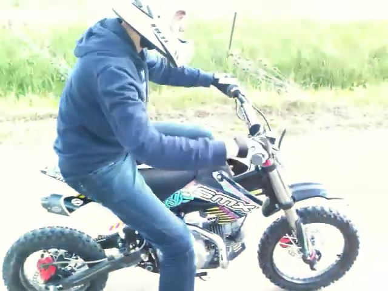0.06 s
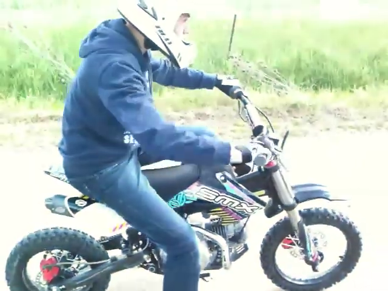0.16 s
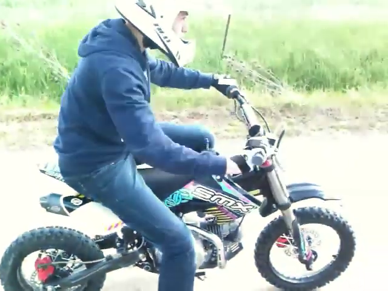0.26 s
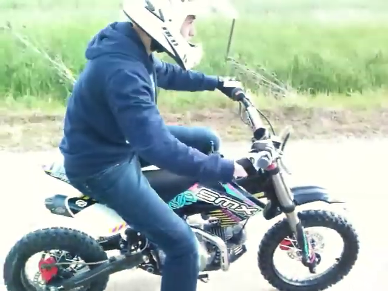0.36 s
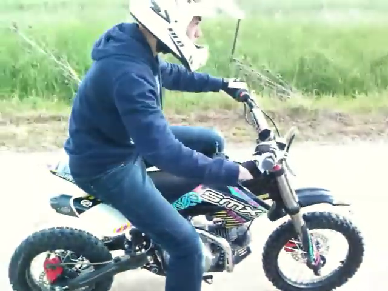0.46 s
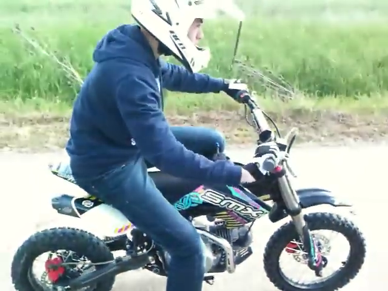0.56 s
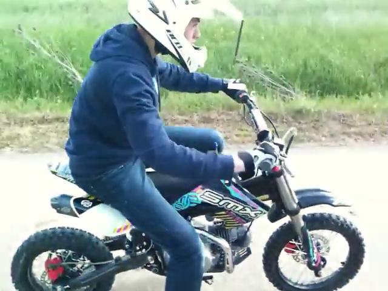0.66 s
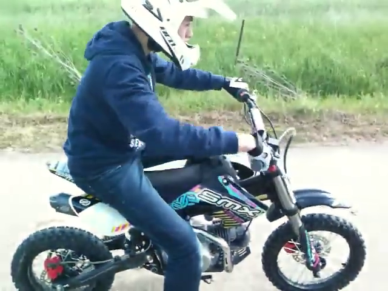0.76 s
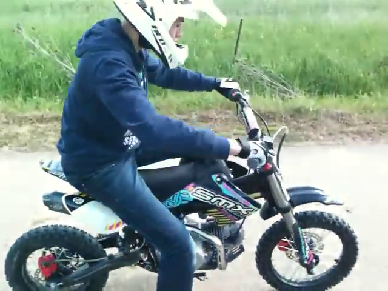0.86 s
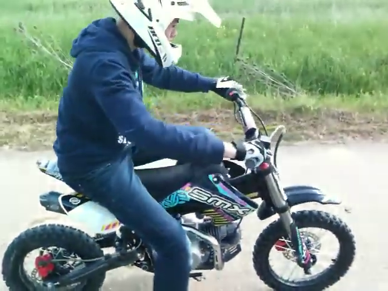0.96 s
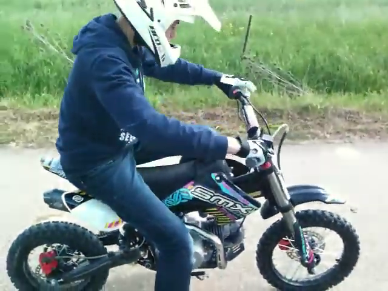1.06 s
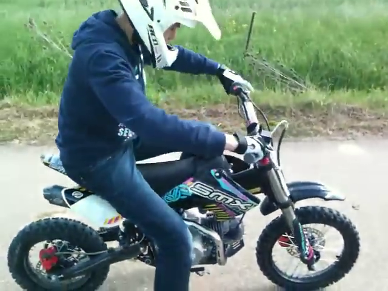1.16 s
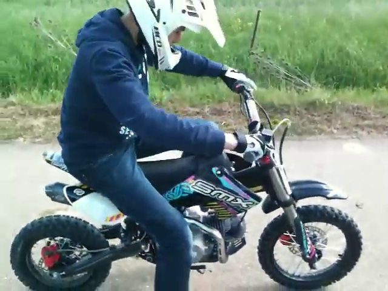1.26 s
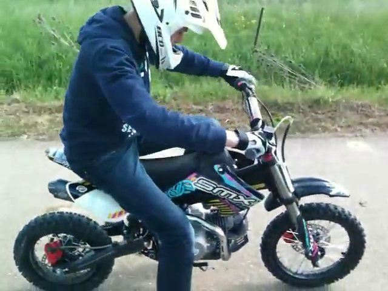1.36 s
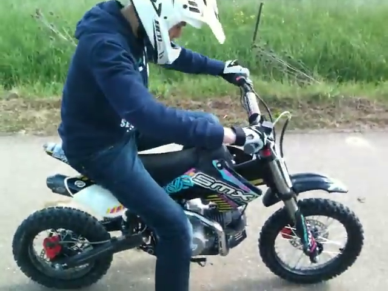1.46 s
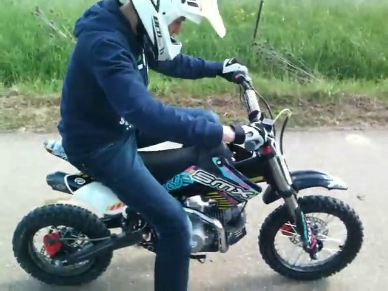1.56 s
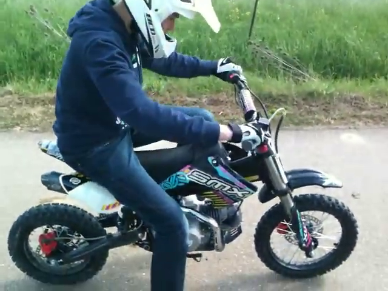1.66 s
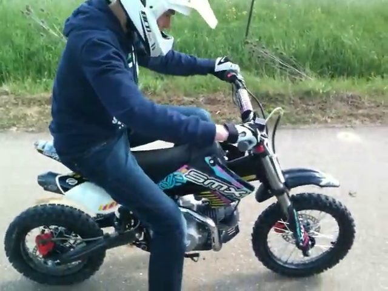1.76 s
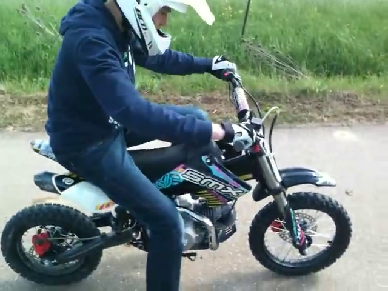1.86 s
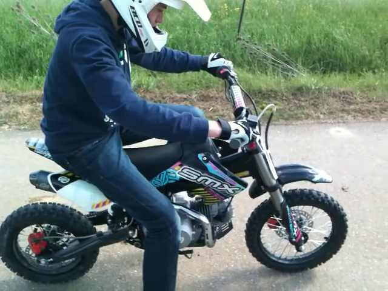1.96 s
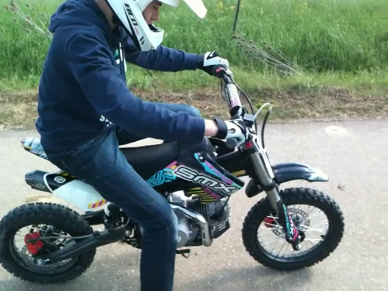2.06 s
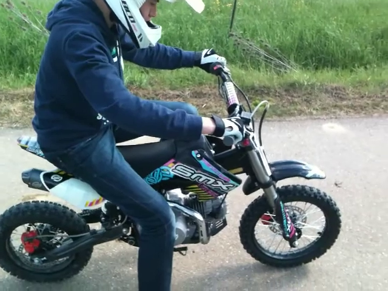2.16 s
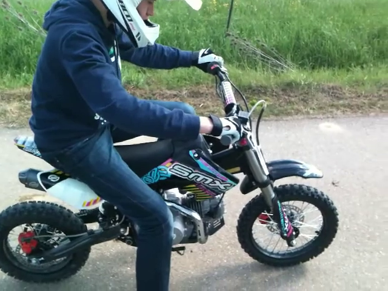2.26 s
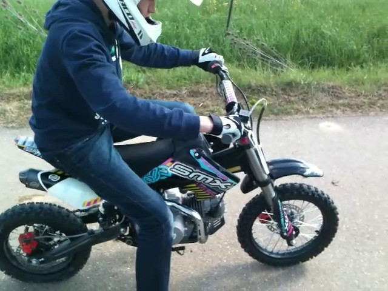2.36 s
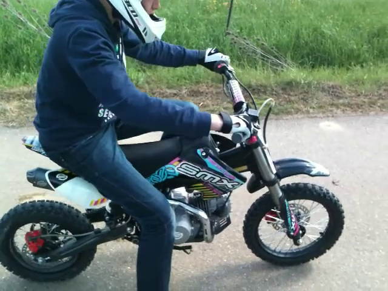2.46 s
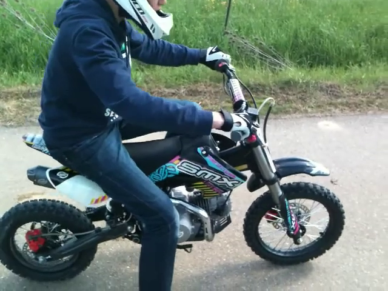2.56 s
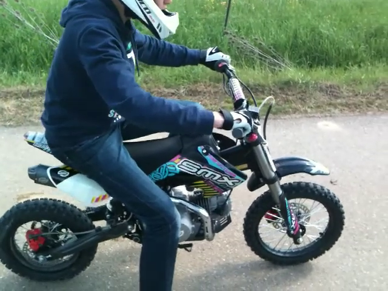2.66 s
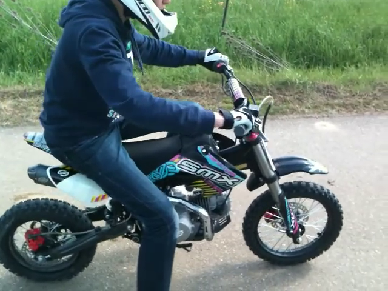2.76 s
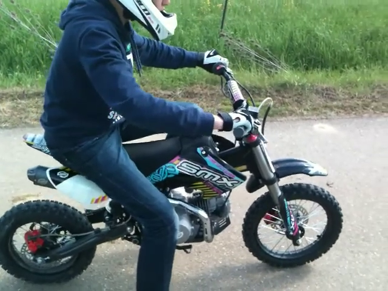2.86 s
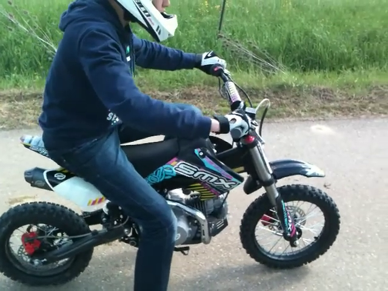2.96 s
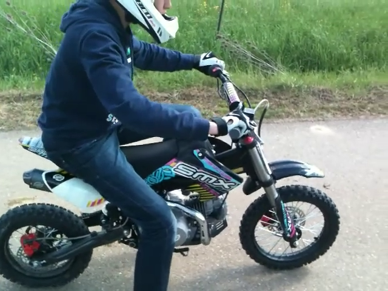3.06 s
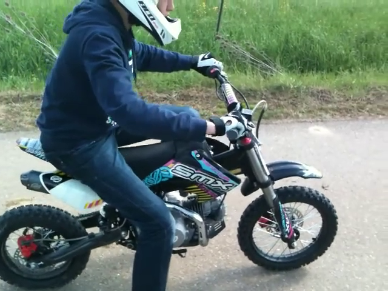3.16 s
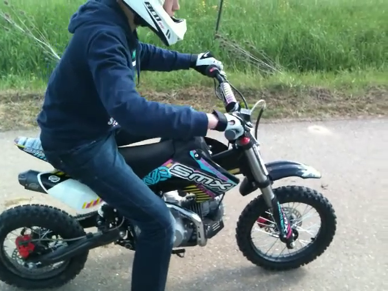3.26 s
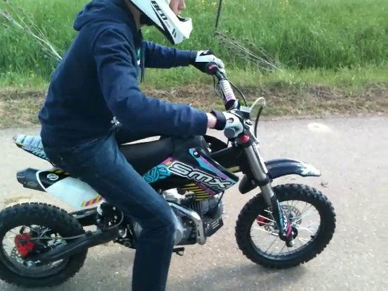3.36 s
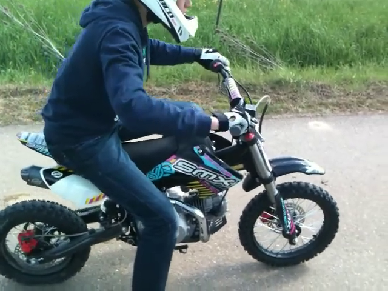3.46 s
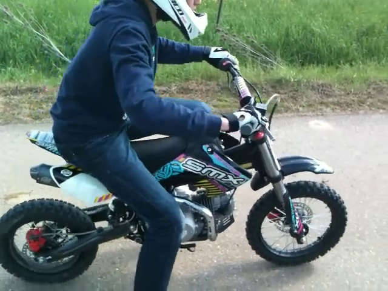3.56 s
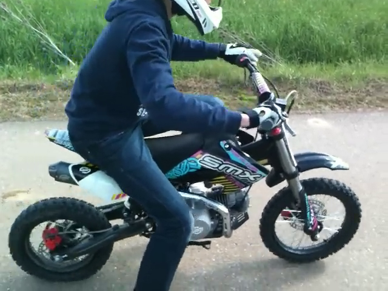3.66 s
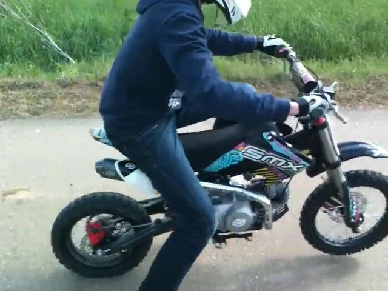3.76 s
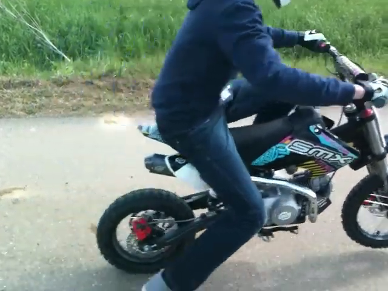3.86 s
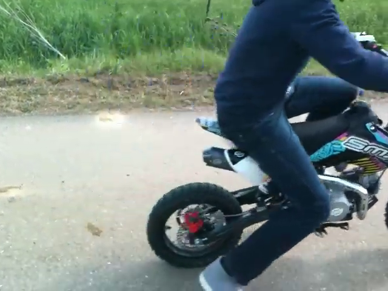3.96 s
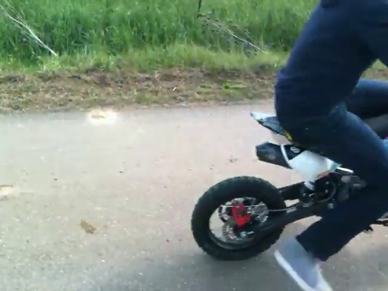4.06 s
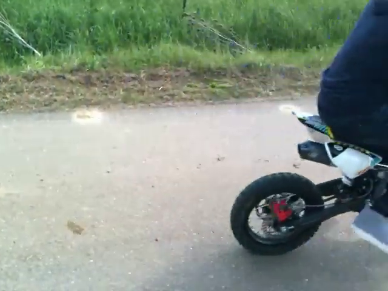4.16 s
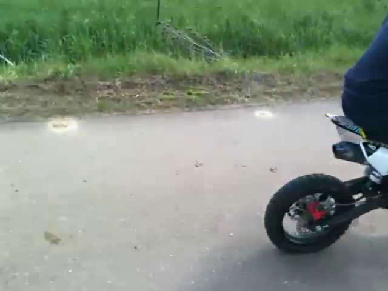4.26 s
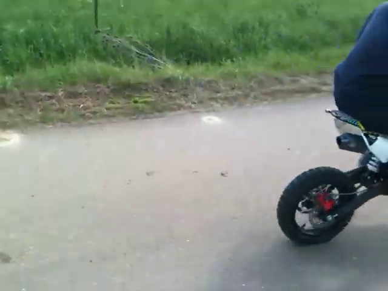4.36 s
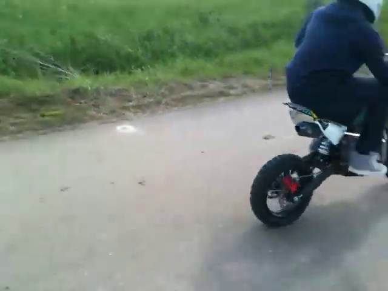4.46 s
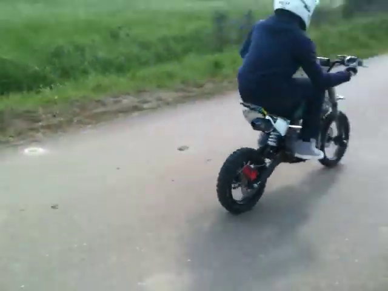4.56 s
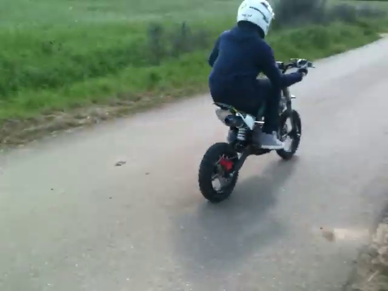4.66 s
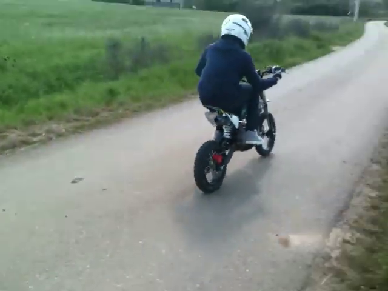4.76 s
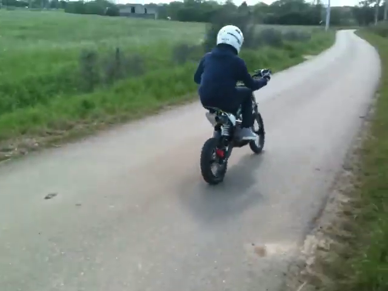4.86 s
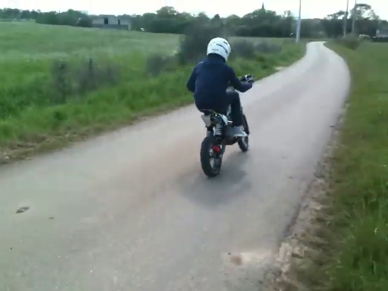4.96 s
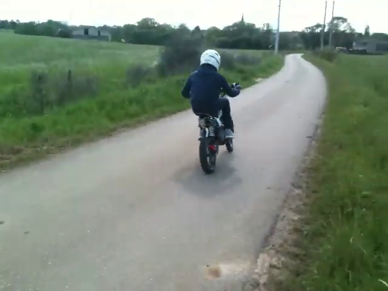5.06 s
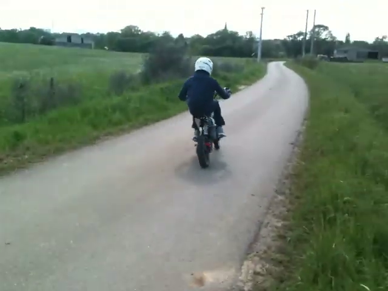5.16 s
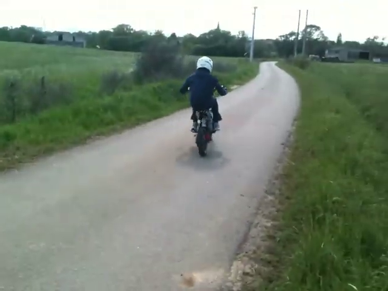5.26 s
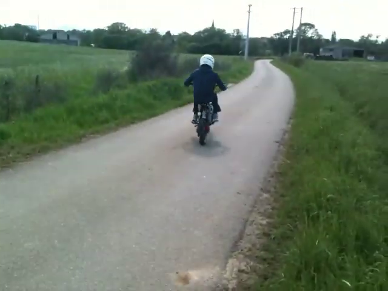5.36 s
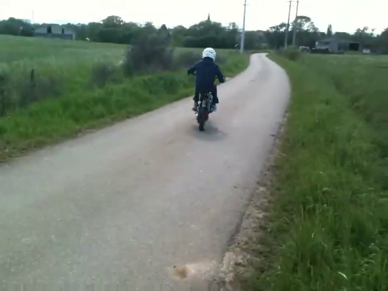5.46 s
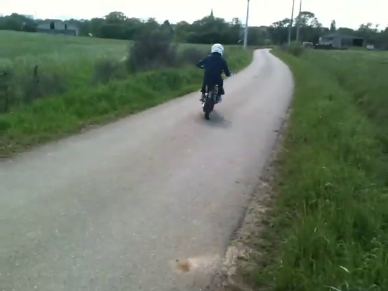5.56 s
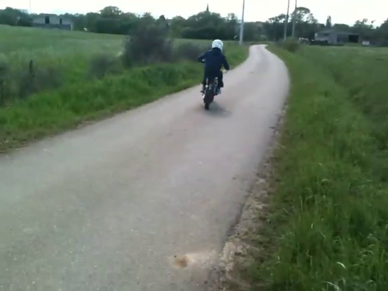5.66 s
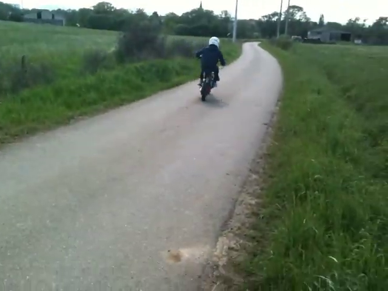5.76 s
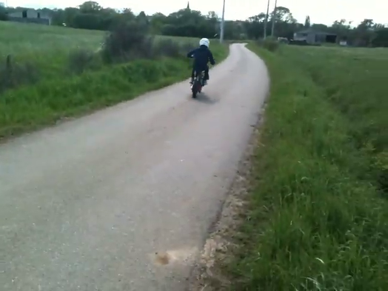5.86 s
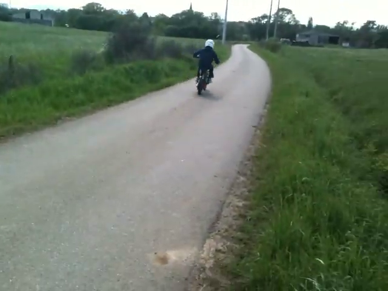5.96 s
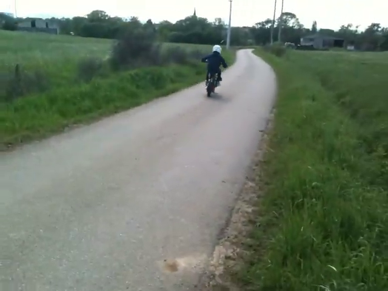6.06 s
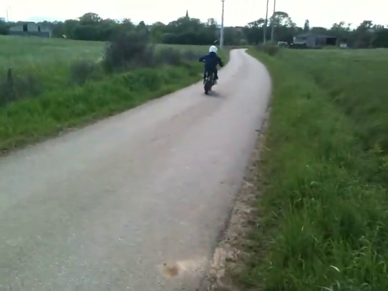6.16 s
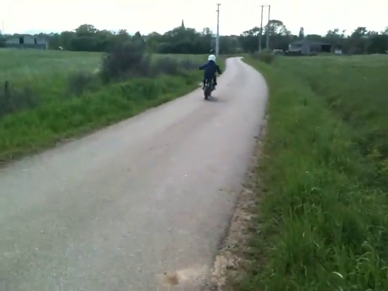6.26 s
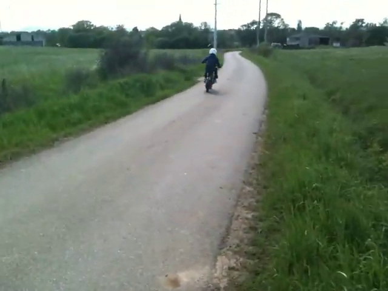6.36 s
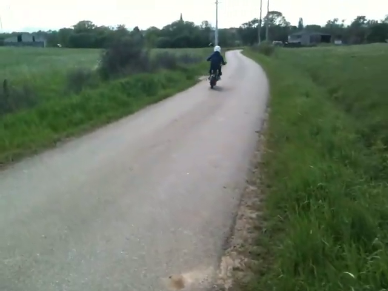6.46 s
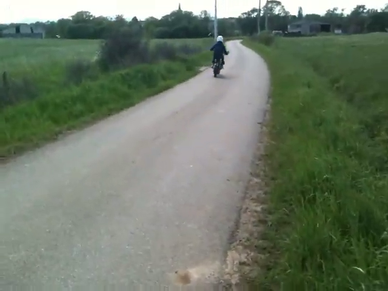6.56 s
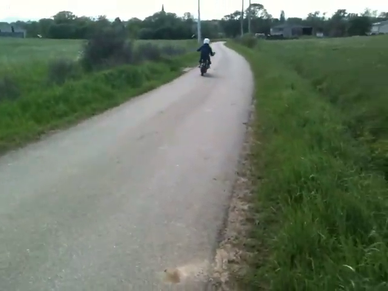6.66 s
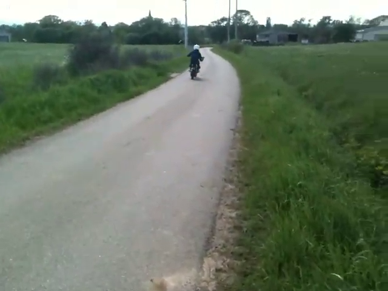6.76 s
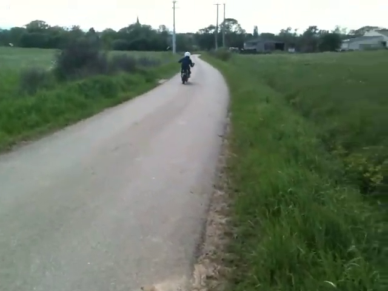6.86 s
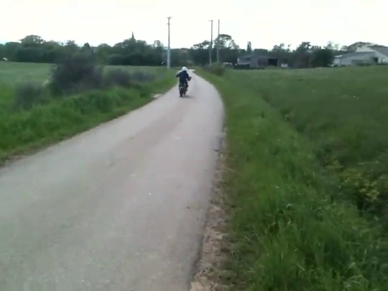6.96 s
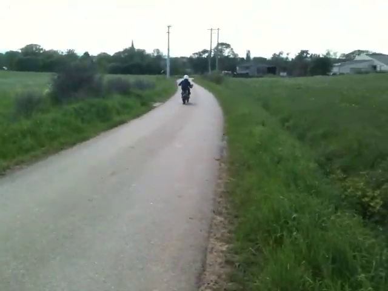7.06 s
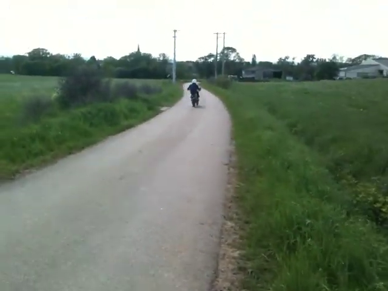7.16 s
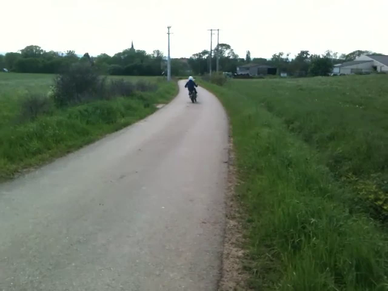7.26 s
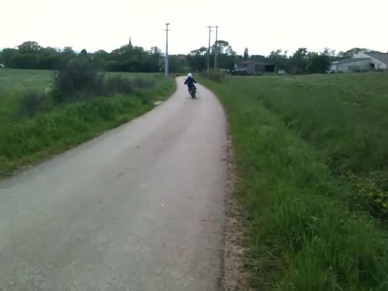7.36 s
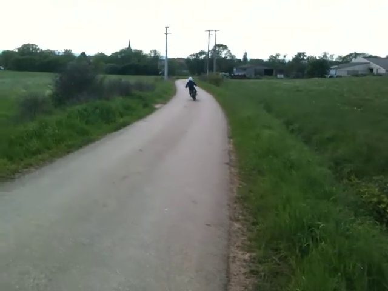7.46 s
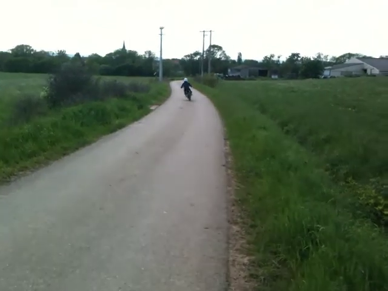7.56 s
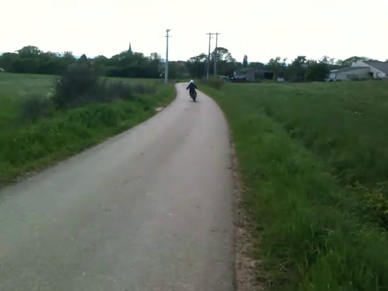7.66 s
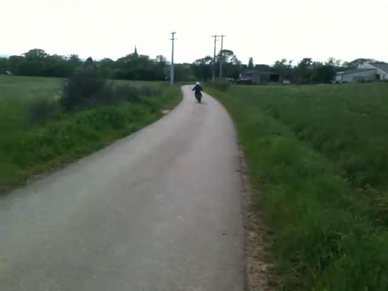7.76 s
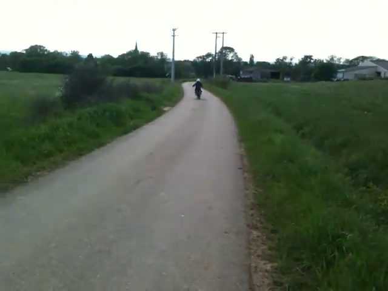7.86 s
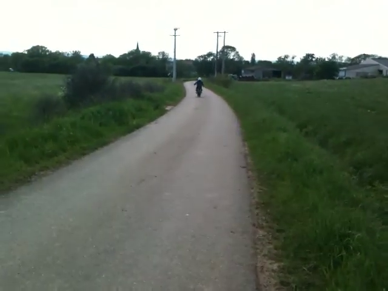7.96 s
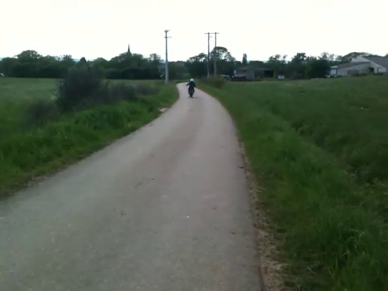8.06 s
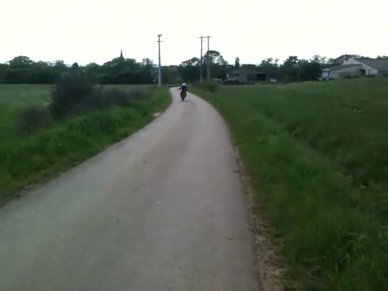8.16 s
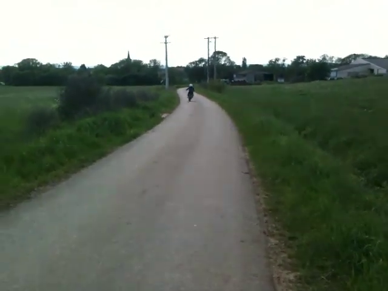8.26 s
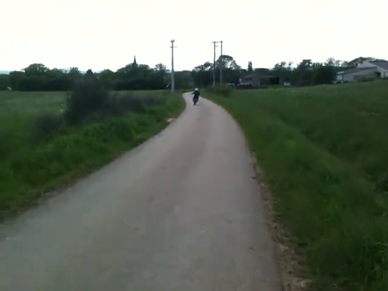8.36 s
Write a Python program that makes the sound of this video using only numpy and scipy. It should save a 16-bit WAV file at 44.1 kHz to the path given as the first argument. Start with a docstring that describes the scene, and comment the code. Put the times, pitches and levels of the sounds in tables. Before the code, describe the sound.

Close raspy pit bike blips, runs down to slow puttering and clatter, gets nudged, then accelerates off along an open lane, changing gear once.

```python
"""Pit bike blipped, then ridden off

A single-cylinder pit bike close by is blipped twice, runs down to idle and is nudged twice,
then pulls away along an open lane, shifts up and climbs in pitch again, far off.
Every firing is a pressure pulse that rings pipe and silencer, with hissing gas around it.
With the throttle shut only soft puffs and engine clatter remain; a faint tail and air noise lie beneath.
"""
import sys
import numpy as np
from scipy import signal
from scipy.fft import irfft
from scipy.io import wavfile
from scipy.ndimage import uniform_filter1d

SR = 44100
rng = np.random.default_rng(int(sys.argv[2]) if len(sys.argv) > 2 else 0)


def transcribe(u):
    """Save the signal u as a 16-bit wav file named by the first command-line argument.

    u: samples, shape (n,) or (channels, n), limited to [-1, 1]; the rate is SR.
    q: integer samples, one column per channel.
    """
    v = np.clip(np.atleast_2d(u).T, -1, 1)
    q = np.round(v * 32767).astype(np.int16)
    wavfile.write(sys.argv[1], SR, q)


N = 371763
PULSE_SAMPLES = 4096
HZ = np.fft.rfftfreq(PULSE_SAMPLES, 1 / SR)
TIME = np.arange(N) / SR
MID_RATE = 60  # firings per second at which levels are quoted


def amp(db):
    """Decibels to gain."""
    return 10 ** (np.asarray(db) / 20)


def at(table, s):
    """The columns of a curve table at the times s."""
    times, *columns = np.transpose(table)
    return [np.interp(s, times, column) for column in columns]


def read(points, hz):
    """A spectrum in dB on a log-frequency axis."""
    f, db = np.transpose(points)
    return np.interp(np.log(hz + 1), np.log(f), db)


def peak(hz, centre_hz, width_hz, height_db):
    """The dB that one resonance adds to a spectrum."""
    detune = 2 * (hz - centre_hz) / width_hz
    return 10 * np.log10(1 + (amp(height_db) ** 2 - 1) / (1 + detune ** 2))


# Resonances of the hollow before the microphone. Each row: centre in Hz, width in Hz, height in dB.
PORT = [(1886, 370, 4), (4900, 420, 25)]


def heard(points, hz):
    """A spectrum in dB with the microphone's resonances on it."""
    return read(points, hz) + sum(peak(hz, *mode) for mode in PORT)


def causal(db):
    """Minimum-phase spectrum: with these magnitudes it starts sharply and rings afterwards."""
    nepers = db * np.log(10) / 20
    mirrored = np.r_[nepers, nepers[-2:0:-1]]
    return np.exp(signal.hilbert(mirrored).conj()[:len(db)])


def noise(colour, gate=1):
    """Gated noise of rms 1 that rings in a colour."""
    x = signal.oaconvolve(gate * rng.standard_normal(N), irfft(causal(heard(colour, HZ))))[:N]
    return x / x.std()


def add(mix, s, spectrum):
    """Mixes in a pulse, given by its spectrum, at its exact time."""
    start, fraction = divmod(max(s, 0) * SR, 1)
    part = mix[int(start):][:PULSE_SAMPLES]
    delayed = spectrum * np.exp(-2j * np.pi * HZ * fraction / SR)
    part += irfft(delayed)[:len(part)]


# Register edges for thump, bark, ring and rasp. Each entry: edge in Hz.
BANDS = [90, 500, 1300, 2300, 12000]


def band_db(spectrum, rate):
    """Levels of thump, bark, ring and rasp when a pulse repeats at this rate."""
    power = abs(spectrum) ** 2 * 2 * rate / (PULSE_SAMPLES * SR)
    return 10 * np.log10(np.add.reduceat(power, np.searchsorted(HZ, BANDS))[:-1])


def scatter(spread_db):
    """No two combustions are alike: a smooth random change of colour."""
    points = np.c_[np.geomspace(100, 12000, 12), rng.standard_normal(12)]
    return spread_db * read(points, HZ)


# Path of the bike. Each row: time in seconds, distance in m.
DISTANCE = [(3.6, 2.12), (4.3, 2.48), (4.8, 5.57), (5.2, 7), (5.6, 8.17), (6.2, 15.7), (7.2, 31),
            (8.43, 21)]


def place(s):
    """The bike's distance in m, and the view of it: 0 from the side towards 1 from behind."""
    metres, = at(DISTANCE, s)
    return metres, np.clip(1 - DISTANCE[0][1] / metres, 0, 1)


# Throttle twists. Each row: start in seconds, end in seconds, bite in dB, opening time in seconds.
TWISTS = [(0, 0.168, 3, 0.013), (0.27, .79, 2, 0.014), (3.044, 3.303, -6.5, 0.09),
          (3.611, 3.984, -5, 0.0165), (4.124, 8.501, -1, 0.019)]
CLOSE_S = .04
# Bite added to every twist, varying on the ride. Each row: time in seconds, bite in dB.
BITE = [(4.135, -1.5), (4.45, 2), (4.65, 11.5), (4.83, 0.5), (5, 5), (5.2, -5.5), (5.7, -2), (6.25, -13.5),
        (6.42, -8.5), (6.7, -13.5), (7.05, -12), (7.4, -13.5), (8.1, -6.5)]


def grip(s):
    """How far the throttle is open (0-1), and the bite in dB that the twist gives."""
    opening = bite_db = 0
    for start, end, db, open_s in TWISTS:
        opening = opening + np.clip(np.minimum((s - start) / open_s, (end - s) / CLOSE_S), 0, 1)
        bite_db = bite_db + db * (s >= start) * (s < end)
    return opening, bite_db + at(BITE, s)[0]


# Thump, bark, ring and rasp of a firing. Each row: level in dB at MID_RATE, dB per octave of speed,
# dB from behind, dB per m, share of the bite, dB with the throttle barely open.
REGISTERS = [(-19, 7.5, 0.4, -0.2661, 0.32, -9.5), (-21, 11, -7, 0.2118, 0.48, -16),
             (-17.5, 11, 2.33, -0.2738, 0.78, -17.5), (-35, 11.5, -1, -0.1617, 0.75, -19)]
# Bass lift, added to the thump. Each row: time in seconds, level in dB.
BASS = [(4.135, 4), (4.6, -0.5), (5.2, 0.5), (5.9, -2), (6.6, 0), (7.1, 3.5), (7.6, -5.5), (8.43, -12)]


def power_db(s, rate):
    """Thump, bark, ring and rasp vary with speed, throttle, distance and view."""
    opening, bite_db = grip(s)
    metres, behind = place(s)
    octaves = np.log2(rate / MID_RATE)
    causes = np.array([np.ones_like(rate), octaves, behind, metres, bite_db, 1 - opening])
    levels = np.array(REGISTERS) @ causes
    levels[0] += at(BASS, s)[0]
    return levels


# Pipe by view. Each row: view from 0 beside to 1 behind, ring height in dB,
# second pulse in dB at MID_RATE, its lag in cycles.
ASPECTS = [(0, 28.5, 1.5, 0.2146), (.3, 24, 1, 0.1326), (.59, 23, 0.5, 0.1375), (.69, 10.5, -29, 0.1295),
           (.72, 17, -10, 0.334), (.78, 16, -12.5, .333), (.86, 18.5, -4.5, .333), (.95, 11.5, 3.5, .335)]
SECOND_DB_PER_OCTAVE = 15.5
RING_HZ, WARM_S, WARM_HZ_PER_S = 1600, 5.5, 60


def pipe(s, rate):
    """The pipe's ring (Hz, dB), climbing as gas heats, and its second pulse (dB, lag in cycles)."""
    ring_db, second_db, lag = at(ASPECTS, place(s)[1])
    ring_hz = RING_HZ + WARM_HZ_PER_S * np.maximum(s - WARM_S, 0)
    return ring_hz, ring_db, second_db + SECOND_DB_PER_OCTAVE * np.log2(rate / MID_RATE), lag


# Silencer chambers. Each row: centre in Hz, width in Hz, height in dB.
CHAMBERS = [(172.4, 21, 8), (309, 51, 7.5)]


def boom(hz):
    """The dB that the silencer's chambers add, booming on between pulses."""
    return sum(peak(hz, *mode) for mode in CHAMBERS)


def exhaust(turns, rate, throttle, jitter_cycles=.002):
    """One pulse each time the engine completes a cycle."""
    out = np.zeros(N)
    for s in np.interp(np.arange(1, int(turns[-1]) + 1), turns, TIME):
        i = int(s * SR)
        pulse = firing if throttle[i] else puff
        add(out, s + jitter_cycles * rng.standard_normal() / rate[i], pulse(s, rate[i]))
    return out


# Pulse colour from the side. Each row: frequency in Hz, level in dB.
BESIDE = [(40, -25), (90, -13), (150, -8), (280, 3.5), (400, 1.5), (500, 1), (630, 9.5), (860, 10.5),
          (1150, 4), (1400, -14), (1900, -14), (2300, -14.5), (2900, -13), (4000, -32.5), (8000, -19),
          (15000, -30)]
# Pulse colour from behind. Each row: frequency in Hz, level in dB.
BEHIND = [(40, -113), (85, -24), (130, 5.5), (175, 8.5), (300, 9), (450, 4), (640, 0), (900, -6),
          (1150, -2), (1500, 2.5), (1800, -4.5), (2100, 1), (4000, -25), (6500, -36.5), (11800, -50),
          (14000, -44)]
NOTCH_HZ_PER_M = 97.4  # lowest notch of the road's echo climbs with distance


def firing(s, rate, road=0.48, road_beside=0.015, lead_rad=1.97, third_db=-13, third_lag=.62,
           ring_width_hz=110, uneven_db=0.81, slow_uneven_db=0.3, slow_rate=35, beam=1.34):
    """Blowdown, then weaker or stronger gas pulses in the cycle; all ring the pipe and bounce off the road."""
    ring_hz, ring_db, second_db, lag = pipe(s, rate)
    metres, behind = place(s)
    aim = behind ** beam
    colour = (1 - aim) * heard(BESIDE, HZ) + aim * heard(BEHIND, HZ)
    colour = colour + boom(HZ) + peak(HZ, ring_hz, ring_width_hz, ring_db)

    # later pulses keep their crank angle, so they favour certain harmonics
    order = HZ / rate
    second = np.exp(1j * (lead_rad - 2 * np.pi * order * lag))
    third = amp(third_db) * np.exp(1j * (lead_rad - 2 * np.pi * order * third_lag))  # dB re second
    echo = (road_beside + road * behind) * np.exp(-1j * np.pi * HZ / (NOTCH_HZ_PER_M * metres))
    pattern = (1 + amp(second_db) * (second + third)) * (1 + echo)

    # load and distance set the strength of each register
    lift_db = power_db(s, rate) - band_db(amp(colour) * pattern, rate)
    corners_hz = np.ravel([np.multiply(BANDS[:-1], 1.15), np.divide(BANDS[1:], 1.15)], "F")
    colour = colour + read(np.c_[corners_hz, np.repeat(lift_db, 2)], HZ)
    return -causal(colour + scatter(uneven_db + slow_uneven_db * (rate < slow_rate))) * pattern


def burst(turns, angle, length):
    """A gate that jumps at one crank angle and dies away (both in cycles)."""
    return np.exp(-((turns - angle) % 1) / length)


# Gas hiss colour. Each row: frequency in Hz, level in dB.
RASP = [(300, 17.5), (1500, -12), (2500, 3), (4000, 6), (6500, -1), (8000, 5.5), (11500, 5.5), (13000, -2),
        (16000, -29)]


def gas_rush(turns, rate, throttle, rasp_db=-6, rumble_db=-31):
    """Turbulent gas hisses with each pulse and rumbles beneath it while the throttle is open."""
    thump_db, _, _, hiss_db = power_db(TIME, rate)
    _, _, second_db, lag = pipe(TIME, rate)
    second = amp(second_db)
    gate = 0.06 + burst(turns, 0, 0.1) + second * burst(turns, lag, 0.02)
    hiss = noise(RASP, gate / np.hypot(1, second))
    rumble = noise([(20, -7), (70, -38), (200, 5), (600, 62), (2000, -82), (8000, -70)])
    gas = amp(hiss_db + rasp_db) * hiss + amp(thump_db + rumble_db) * rumble
    return uniform_filter1d(throttle, size=200) * gas


def shell(x, shell_db=-9, t60_s=0.056):
    """The silencer's sheet metal smears each crack by a few milliseconds."""
    t = TIME[:PULSE_SAMPLES]
    taps = rng.standard_normal(len(t)) * amp(-60 * t / t60_s)
    taps = signal.lfilter(*signal.butter(2, 700, "high", fs=SR), taps / np.linalg.norm(taps))
    smear = signal.oaconvolve(x, taps)[:N]
    return (x + amp(shell_db) * smear) / np.hypot(1, amp(shell_db))


def drift(x, beside_db=1.28, behind_extra_db=0.48, frames=25):
    """Moving air and the swaying bike make the colour wander, more so once it is under way."""
    _, s, z = signal.stft(x, SR, nperseg=1024, noverlap=768)
    patches = rng.standard_normal(z.shape)
    for _ in range(2):
        patches = uniform_filter1d(patches, size=5, axis=0)
        patches = uniform_filter1d(patches, size=frames, axis=1)
    _, behind = place(s)
    z = z * amp((beside_db + behind_extra_db * behind) * patches / patches.std())
    return signal.istft(z, SR, nperseg=1024, noverlap=768)[1][:N]


def coast_db(level, rate):
    """A level that follows the engine's speed alone."""
    db, db_per_octave = level
    return db + db_per_octave * np.log2(rate / MID_RATE)


# Knock colour. Each row: frequency in Hz, level in dB.
CLATTER = [(40, -38), (100, -13), (350, 6), (600, -22.5), (1000, -46), (1450, -2.5), (1770, 12),
           (1900, -3.5), (2200, -28.5), (3000, -64), (8000, -73)]
# Tick colour. Each row: frequency in Hz, level in dB.
TICKING = [(50, -10), (300, 13.5), (1200, 16), (2400, 6.5), (3300, -4), (4300, -5), (5800, -11),
           (7000, -1.5), (8000, 5), (9500, -5.5), (11800, -2), (13000, -21), (16000, -17)]
# Ticks with the throttle shut, beside. The row: level in dB at MID_RATE, dB per octave of speed.
TICK_LEVEL = (-36, 11.66)
# knocks are loudest at this rate, and this much weaker an octave away
CLATTER_DB, CLATTER_RATE, CLATTER_FALL_DB = -31.5, 69.6, 4


def mechanics(turns, rate, throttle, open_throttle_db=-3):
    """Piston and valves knock at fixed crank angles; they fade as the bike leaves."""
    knock_db = CLATTER_DB - CLATTER_FALL_DB * np.log2(rate / CLATTER_RATE) ** 2
    knocks = noise(CLATTER, 0.2 + burst(turns, 0.0021, 0.48) + 1.2 * burst(turns, 0.22, 0.056))
    ticks = noise(TICKING, 0.67 + .5 * burst(turns, 0.051, 0.28) + burst(turns, 0.26, 0.53))
    near = amp(open_throttle_db * throttle) * DISTANCE[0][1] / place(TIME)[0]
    return near * (amp(knock_db) * knocks + amp(coast_db(TICK_LEVEL, rate)) * ticks)


def verges(x, wet_db=-24, t60_s=.24):
    """Grass banks scatter a faint short tail."""
    t = TIME[:SR // 2]
    taps = rng.standard_normal(len(t)) * amp(-60 * t / t60_s) * (t > .008)
    taps = signal.lfilter(*signal.butter(1, 2500, fs=SR), taps / np.linalg.norm(taps))
    return amp(wet_db) * signal.oaconvolve(x, taps)[:N]


# Puff colour. Each row: frequency in Hz, level in dB.
PUFF = [(40, -75), (80, -8.5), (150, 3), (300, 3.5), (440, 5), (560, -6.5), (800, -9), (1100, -20),
        (1500, -8.5), (2000, -27.5), (3000, -52), (8000, -71)]
# Puff thump. The row: level in dB at MID_RATE, dB per octave of speed.
PUFF_LEVEL = (-27, 13)


def puff(s, rate, uneven_db=.2, idle_uneven_db=2.3, steady_rate=50):
    """With the throttle shut the exhaust gives one dull puff a cycle, less even near idle."""
    # a slower piston gives a longer, deeper puff
    colour = heard(PUFF, HZ * (steady_rate / rate) ** 0.26) + boom(HZ)
    level_db = coast_db(PUFF_LEVEL, rate) - band_db(amp(colour), rate)[0]
    return causal(colour + level_db + scatter(uneven_db + idle_uneven_db * (rate < steady_rate)))


GEAR_S, GEAR_DB, GEAR_T60_S = 2.405, -37, .17


def gearbox():
    """One short metallic clack near idle: decaying noise in the colour of the ticks."""
    age = TIME - GEAR_S
    return (age > 0) * amp(GEAR_DB - 60 * abs(age) / GEAR_T60_S) * noise(TICKING)


# Engine speed, gliding by equal ratios. Each row: time in seconds, firings per second.
SPEED = [(0.0, 59.53), (0.149, 68.59), (0.276, 62.25), (0.557, 79.25), (0.752, 85.26), (1.372, 58.26),
         (2.627, 24.67), (3.062, 20.79), (3.295, 37.94), (3.643, 26.33), (3.701, 27.62), (3.794, 22.0),
         (3.944, 27.06), (4.096, 21.01), (4.275, 33.62), (4.752, 55.61), (5.167, 71.48), (5.694, 81.9),
         (6.041, 90.91), (6.257, 92.26), (6.422, 64.46), (6.584, 62.15), (6.896, 67.68), (7.688, 77.43),
         (8.43, 80.71)]
# Air noise colour. Each row: frequency in Hz, level in dB.
AIR = [(20, -49), (60, 22), (150, 21), (500, -29), (1800, -33), (3000, -10), (8000, -18), (16000, -53)]


def scene(air_db=-60):
    """The bike in open air."""
    times, rates = np.transpose(SPEED)
    rate = np.exp(np.interp(TIME, times, np.log(rates)))
    turns = np.cumsum(rate) / SR + .25  # engine cycles
    throttle = (grip(TIME)[0] > 0).astype(float)
    tailpipe = shell(exhaust(turns, rate, throttle)) + gas_rush(turns, rate, throttle)
    bike = drift(tailpipe) + mechanics(turns, rate, throttle) + gearbox()
    return (bike + verges(bike) + amp(air_db) * noise(AIR))[None]


EDGE_HZ = 15900


def record(dry, drive_db=1, ceiling=.74):
    """The microphone rounds off the loudest peaks; then the band limit."""
    x = amp(drive_db) * dry
    x = x / (1 + (x / ceiling) ** 6) ** (1 / 6)
    lowpass = signal.firwin(511, EDGE_HZ, window=("kaiser", 9), fs=SR)
    return signal.oaconvolve(x, lowpass[None], "same")


dry = scene()
out = record(dry)
transcribe(out)
```